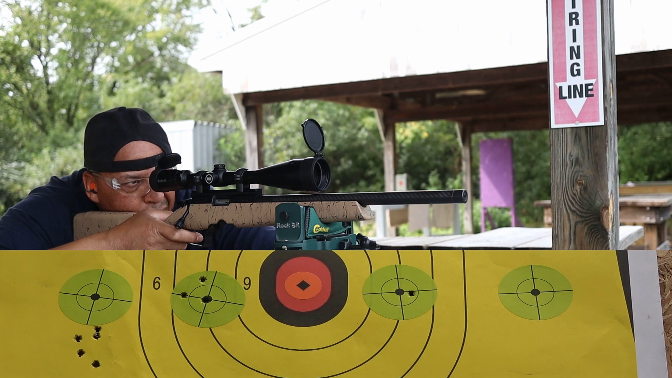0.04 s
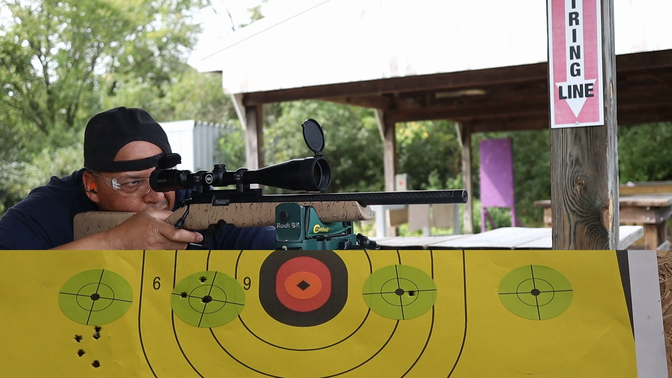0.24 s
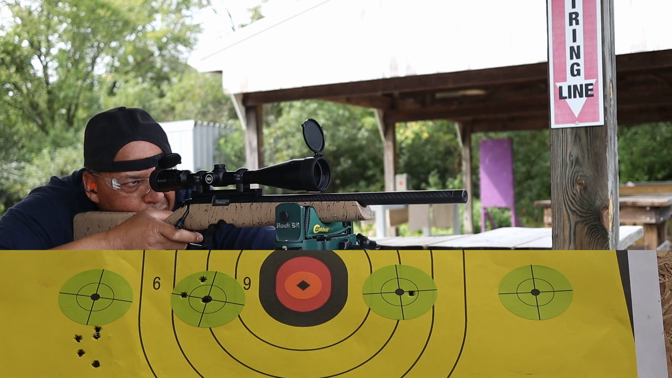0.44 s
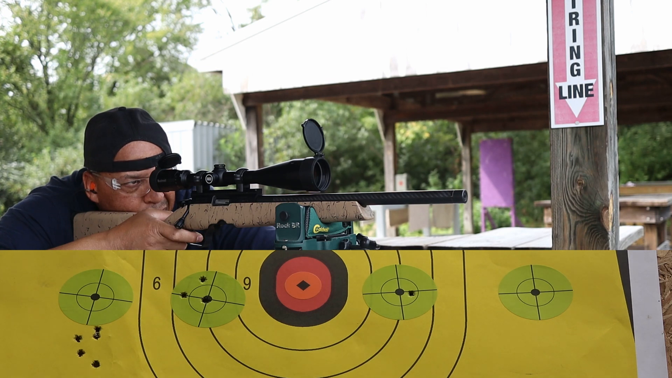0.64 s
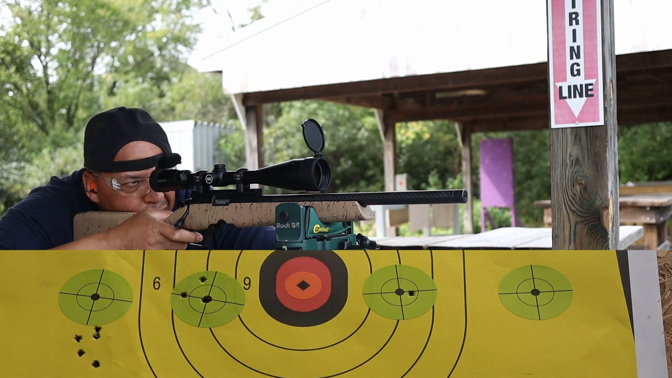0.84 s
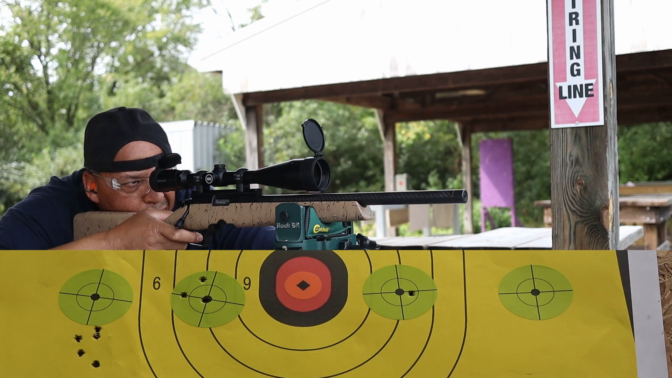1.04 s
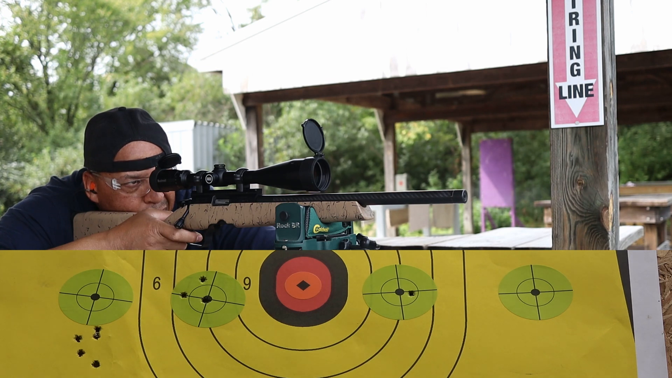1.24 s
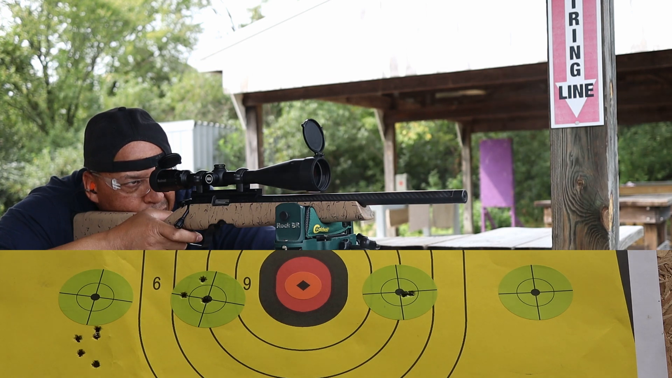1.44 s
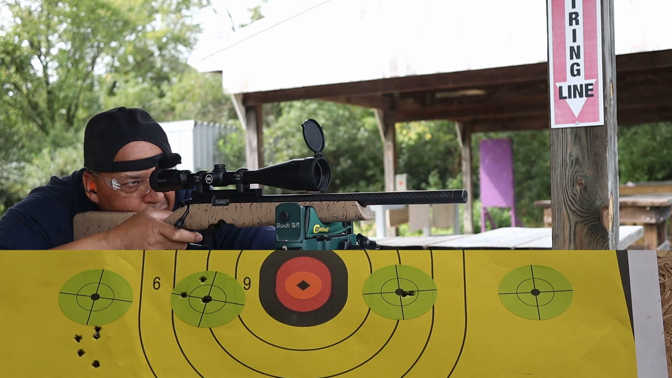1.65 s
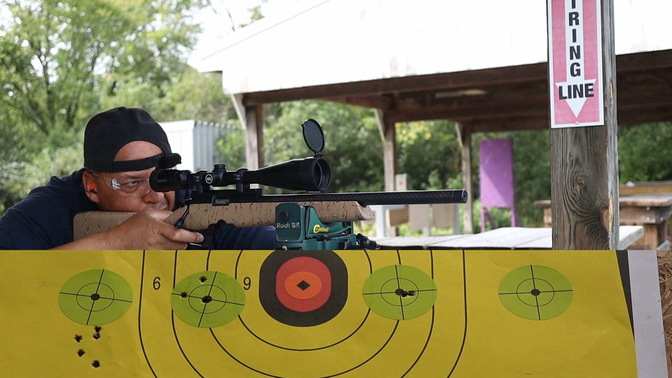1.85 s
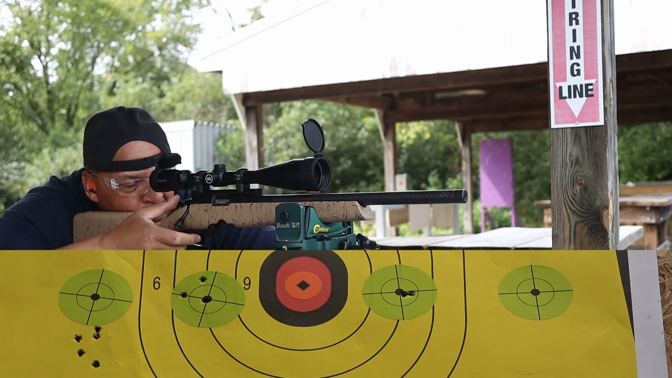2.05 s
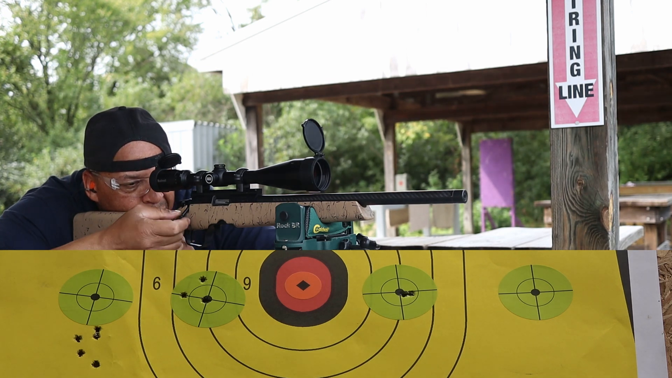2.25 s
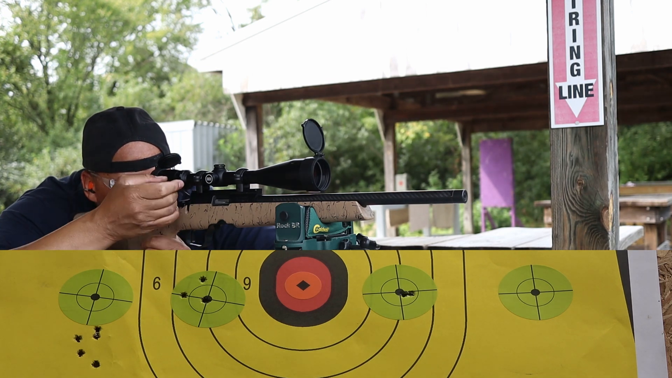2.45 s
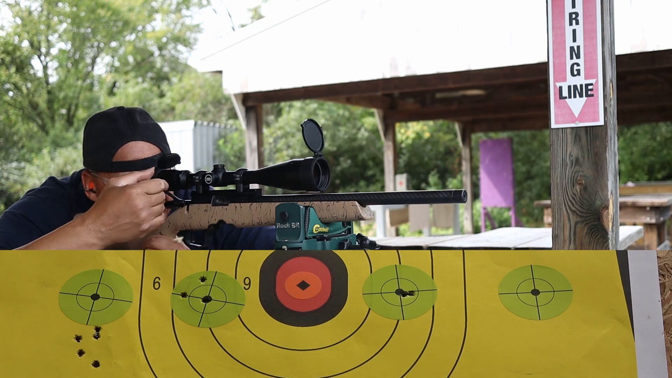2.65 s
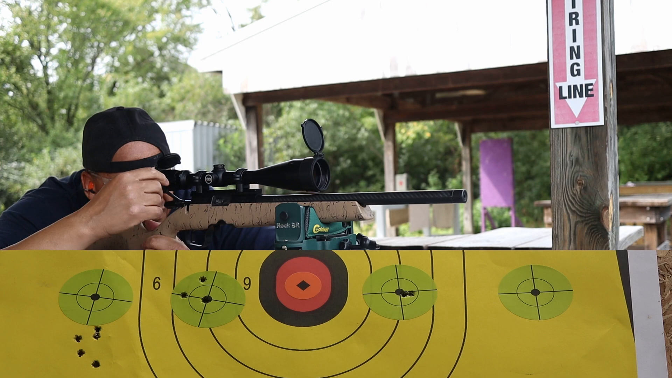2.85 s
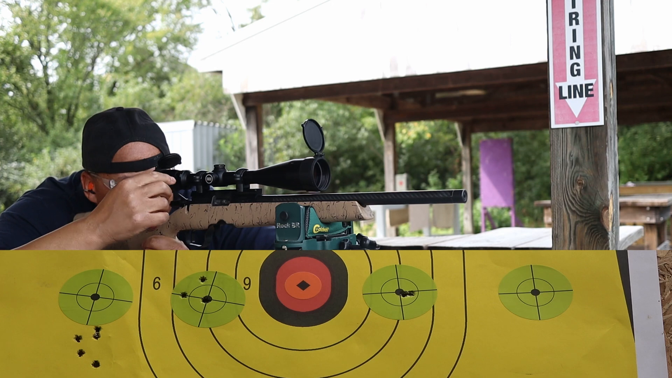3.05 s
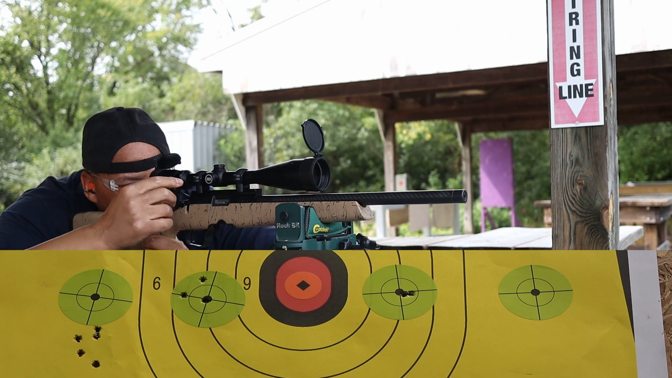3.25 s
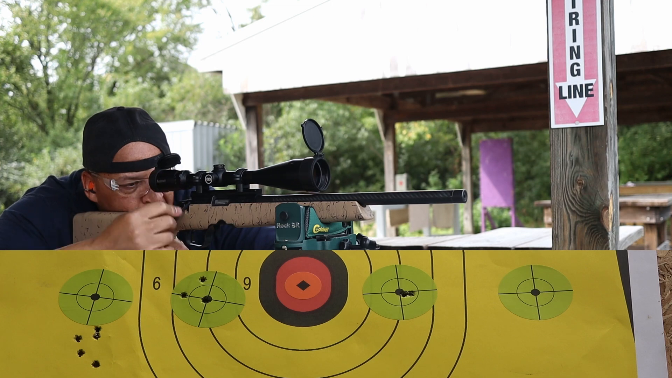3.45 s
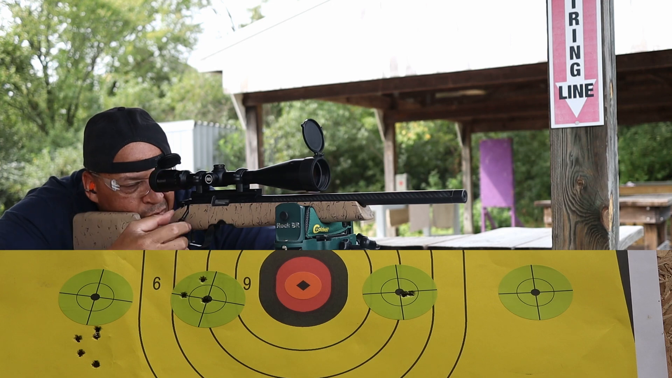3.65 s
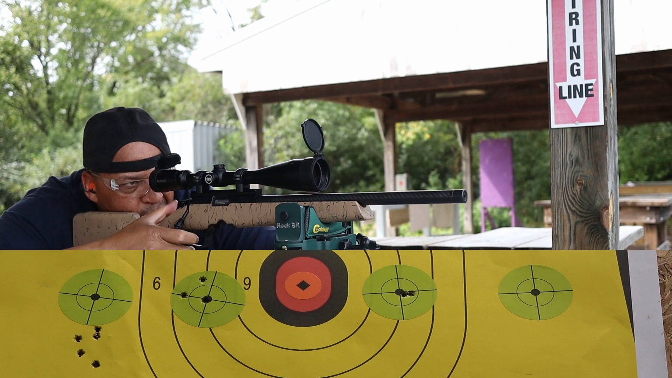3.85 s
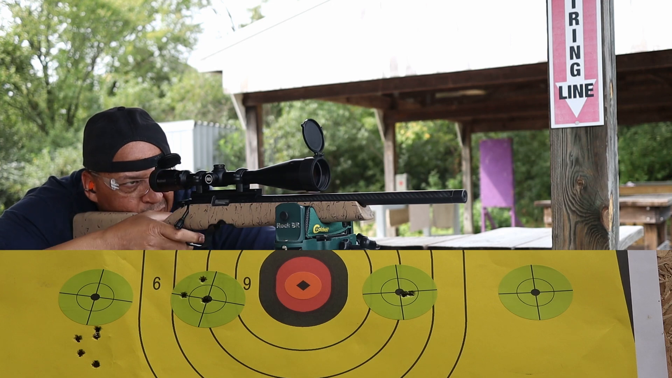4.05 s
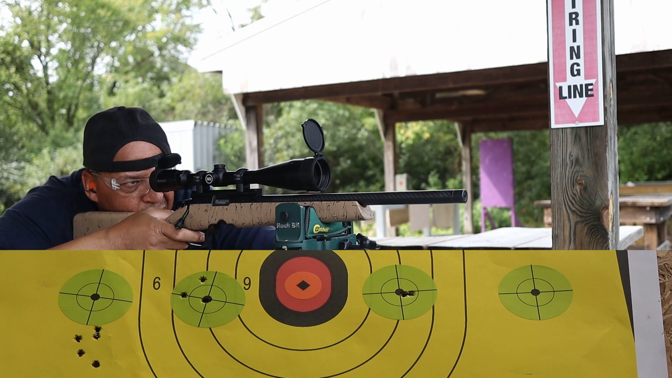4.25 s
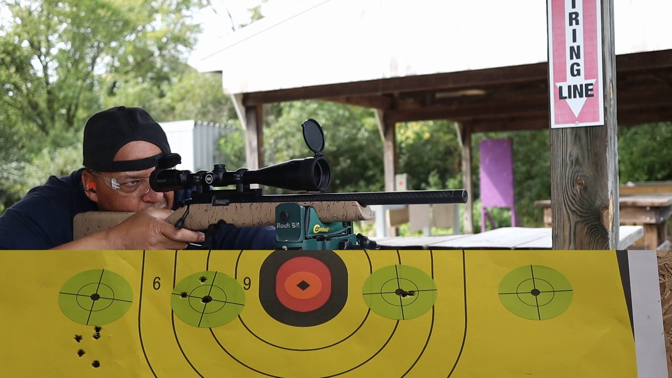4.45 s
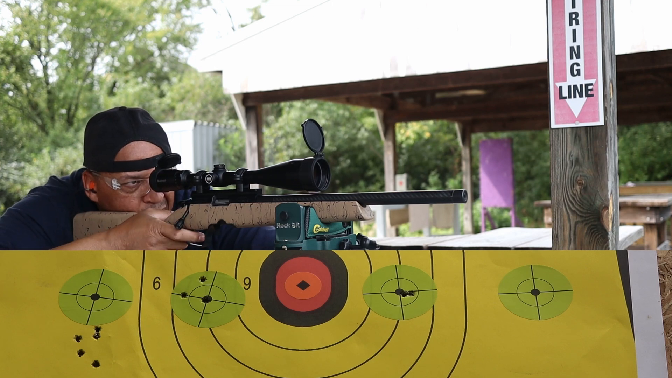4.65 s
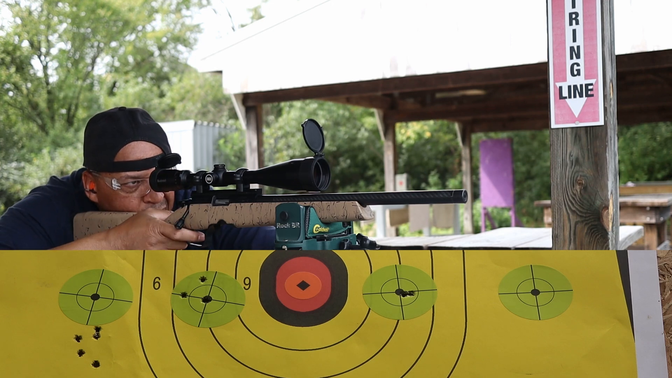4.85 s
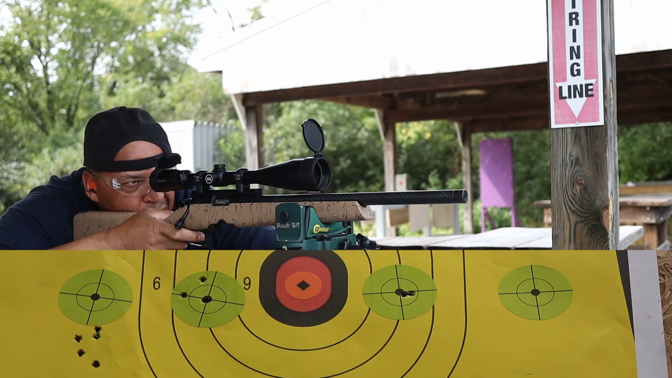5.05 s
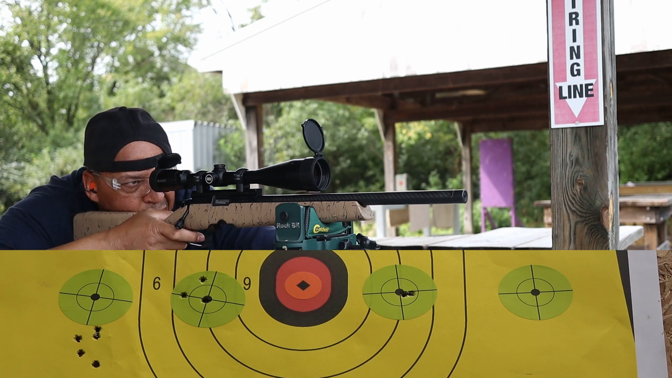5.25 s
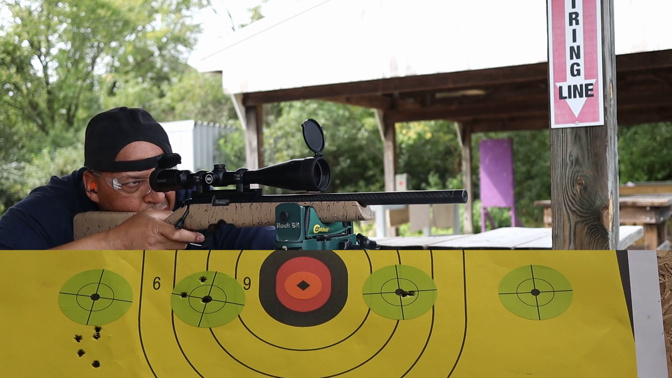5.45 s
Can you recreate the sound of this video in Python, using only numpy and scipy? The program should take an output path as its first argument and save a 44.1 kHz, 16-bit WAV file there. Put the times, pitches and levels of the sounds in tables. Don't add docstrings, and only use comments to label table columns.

```python
import sys
import numpy as np
from scipy import signal
from scipy.fft import rfft, irfft
from scipy.io import wavfile
from scipy.ndimage import uniform_filter1d

SR = 44100
rng = np.random.default_rng(int(sys.argv[2]) if len(sys.argv) > 2 else 0)


def linear_from_db(decibels):
    return 10 ** (np.asarray(decibels, float) / 20)


def materialize(psi):
    bounded = np.clip(np.atleast_2d(psi).T, -1, 1)
    quanta = np.round(bounded * 32767).astype(np.int16)
    wavfile.write(sys.argv[1], SR, quanta)


N = 242991
TIME = np.arange(N) / SR


def rms_one(x):
    return x / np.sqrt(np.mean(x ** 2) + 1e-20)


def level(rows):
    s, db = np.transpose(rows)
    return linear_from_db(np.interp(TIME, s, db, -150, -150))


def at_hz(points, hz, column=1):
    points = np.array(points)
    return np.interp(np.log(hz), np.log(points[:, 0]), points[:, column])


def band(x, low_hz, high_hz):
    edges_hz = [low_hz, min(high_hz, 0.45 * SR)]
    return signal.sosfilt(signal.butter(2, edges_hz, "band", fs=SR, output="sos"), x)


def coloured(spectrum, size=N):
    hz = np.fft.rfftfreq(size, 1 / SR) + 1
    white = rfft(rng.standard_normal(size))
    return rms_one(irfft(white * linear_from_db(at_hz(spectrum, hz)), size))


def drift(rate_hz):
    slow = signal.butter(2, rate_hz, fs=SR, output="sos")
    return rms_one(signal.sosfilt(slow, rng.standard_normal(N + SR))[SR:])


def fall(t, t60):
    return linear_from_db(-60 * t / t60)


def add(track, s, piece):
    i = round(s * SR)
    track[i:i + len(piece)] += piece[:N - i]


def ringing(modes, scatter_db, size):
    hz, db, t60 = np.array(modes).T[:, :, None]
    t = TIME[:size]
    strength = linear_from_db(db + scatter_db * rng.standard_normal(hz.shape))
    return np.sum(strength * np.sin(2 * np.pi * hz * t) * fall(t, t60), axis=0)


# pitch_hz, level_db (per Hz)
AIR = [(25, -9.5), (120, -0.5), (250, -5.5), (600, -11), (1500, -16.5), (3000, -17), (6000, -24.5),
       (7800, -16.5), (9200, -22.5), (12500, -23.5), (15500, -31.5)]


def air(level_db):
    return linear_from_db(level_db) * coloured(AIR)


def pulsed_tone(hz, width_hz, pulses):
    tone = rms_one(band(rng.standard_normal(N), hz - width_hz / 2, hz + width_hz / 2))
    stroke = np.sin(2 * np.pi * pulses * TIME + 9.0 * drift(1))
    return tone * (0.9 + 1.2 * np.maximum(0.28 + stroke, 0))


def phrases(per_s, first_s, share):
    singing = per_s * (TIME - first_s) % 1 < share
    return uniform_filter1d(1. * singing, size=2500)


# pitch_hz, width_hz, level_db, pulses_per_s
CRICKETS = [
    (4850, 260, 0, 27),
    (4480, 220, -3, 29),
    (5200, 200, -6, 24),
    (10300, 700, -14, 27),
]


def crickets():
    chorus_db, low_db, low_fade_db_per_s = -75, -82, 0.9
    chorus = 0
    for k, (hz, width_hz, db, pulses) in enumerate(CRICKETS):
        song = phrases(2.55 * (1 + 0.015 * k), 0.33 + 0.14 * k, share=0.66)
        chorus = chorus + linear_from_db(db + 3.5 * drift(5)) * pulsed_tone(hz, width_hz, pulses) * (0.47 + song)
    chirps = 0.45 + phrases(3.65, -0.03, share=0.45)
    low_gain = linear_from_db(low_db + 2 * drift(1.1) - low_fade_db_per_s * TIME)
    low = low_gain * pulsed_tone(3680, 450, pulses=46) * chirps
    return rms_one(chorus) * linear_from_db(chorus_db) + low


# pitch_hz, level_db (per Hz)
THUMP = [(15, -42), (25, -14.5), (72, 1.5), (91, -4.5), (131, -10), (161, -16), (220, -25), (290, -50.5),
         (480, -120)]
RUBBING = [(120, -25), (200, 0), (292, 9.5), (831, -4), (951, -5), (1110, -7), (1500, -24.5), (1950, -5.5),
           (3300, -120)]
# centre_s, half_width_s, level_db
BENCH = [
    (1.0, 0.19, -60),
    (1.7, .14, -63),
    (2.35, 0.33, -54.5),
    (3.4, 0.31, -58),
    (4.3, 0.44, -56.5),
    (5.15, 0.31, -62),
]
# start_s, loudest_s, end_s, level_db
RUB = [
    (1.8, 2.35, 3.0, -58.5),
    (2.701, 3.2, 3.95, -62.5),
    (3.908, 4.22, 4.45, -66.5),
]


def bench():
    resting_db, rub_fade_db = -80.5, 9.5
    swells = sum(linear_from_db(db) * np.exp(-((TIME - s) / width) ** 2) for s, width, db in BENCH)
    thump = coloured(THUMP) * linear_from_db(5.0 * drift(12)) * (linear_from_db(resting_db) + swells)
    strokes = sum(level([(start, db - rub_fade_db), (loudest, db), (end, db - rub_fade_db)])
                  for start, loudest, end, db in RUB)
    return thump + coloured(RUBBING) * linear_from_db(2 * drift(15)) * strokes


# pitch_hz, level_db, t60_s
CASE_MODES = [(12400, -3, .16), (12470, -8, .12)]
# start_s, level_db (peak)
CASE = [
    (2.8931, -53),
    (2.9865, -56),
    (2.9967, -50),
    (3.6069, -63),
    (3.6268, -61),
    (3.7894, -77),
    (3.8087, -67.5),
]


def case():
    out = np.zeros(N)
    for s, db in CASE:
        add(out, s, linear_from_db(db - 4) * ringing(CASE_MODES, scatter_db=3.5, size=12000))
    return out * linear_from_db(5.0 * drift(90))


# pitch_hz, level_db, t60_s
ACTION = [(1570, -6, .012), (1800, 1, .022), (2000, -4, .016), (2350, -7, .012), (2720, -8, .012),
          (3210, -6, .010), (3600, -6, .010), (4200, -4, .010), (5100, -6, .008)]
# start_s, length_s, start_level_db, end_level_db
SLIDE = [
    (2.12, .08, -58, -62.5),
    (2.432, 0.013, -63, -36),
    (2.668, .052, -47, -41),
    (3.048, 0.082, -47.5, -56),
    (3.227, .023, -47, -32),
    (3.342, .033, -60, -45),
    (3.547, 0.023, -69.5, -44),
    (3.594, 0.05, -59, -64),
]


def sliding():
    clicks = rng.random(N) < 3000 / SR
    grit = clicks * rng.standard_normal(N) * linear_from_db(2.9 * drift(29))
    body = ringing(ACTION + [(700, 2, 0.021), (900, 0.24, 0.023)], scatter_db=2.0, size=2000)
    body[0] = 10.0
    strokes = rms_one(grit) * sum(level([(s, first_db), (s + length, last_db)])
                                  for s, length, first_db, last_db in SLIDE)
    return band(signal.fftconvolve(strokes, body / np.linalg.norm(body))[:N], 400, 6800)


# start_s, level_db (peak thunk in stock), pitch_hz (thunk), steel_level_db (peak), sharpness_db (per band)
REACHING = [
    (1.9644, -76, 472.4, -54, -3.5),
    (2.046, -54, 491, -59, -3),
    (2.1073, -42, 1040, -41, -9),
    (2.1403, -52, 450, -55.5, 1.5),
    (2.152, -53, 446, -51, -3),
    (2.1655, -58, 510, -54, 1),
    (2.19, -45.5, 510, -48.5, 2.5),
    (2.326, -43, 1100, -52.5, -7.5),
]
OPENING = [(2.4376, -43, 719, -51, -5), (2.6719, -55.5, 820, -50, 0), (2.6899, -50, 748, -43, -1),
           (2.4468, -29, 752, -34, -12), (2.5061, -49.5, 750, -43, -24), (2.523, -58, 700, -57, -17),
           (2.552, -48, 670, -43.5, -2), (2.5678, -23.5, 723, -22, -6), (2.6824, -40, 1010, -38, -6),
           (2.697, -53, 900, -32, -20), (2.7124, -26.5, 610, -28.5, -7), (2.7211, -20.5, 920, -13.5, 1.53),
           (2.7234, -20, 450, -12, -4), (2.7282, -22.5, 660, -24.5, -5.5), (2.755, -45, 992, -52, -2.5),
           (2.8939, -30, 466.5, -29, -3.5), (2.987, -59, 432, -50, 0), (2.9965, -51, 812, -47.5, 1.5)]
CLOSING = [(3.0645, -46, 590, -53, 2), (3.235, -35, 793, -38, -16.5), (3.0603, -37.5, 637, -39, -29),
           (3.0942, -36.5, 980, -38.5, -16), (3.1082, -37.5, 710, -45, -22), (3.3233, -54.5, 537, -54, -9),
           (3.3632, -60.5, 790, -46.5, -6), (3.4711, -44.5, 900, -65, 1), (3.573, -32, 900, -33, -7),
           (3.6003, -49, 767, -56.5, 2), (3.6485, -10, 897, -18.5, -6.5), (3.9158, -59, 429.5, -50.5, -14),
           (4.2411, -56, 495, -55, -5), (4.98, -56, 900, -53.5, -7)]
# start_s, touches, level_db (thunk), pitch_hz, steel_level_db
STUTTERS = [
    (3.237, 4, -27, 720, -28.5),
    (3.375, 3, -29.5, 640, -34.5),
]


def contacts():
    gap_s, spread_db, sharpness_db = 0.004, 3.5, -2.5
    touches = []
    for s, count, db, hz, steel_db in STUTTERS:
        for k in range(round(count)):
            uneven_db = steel_db + spread_db * rng.standard_normal()
            touches.append((s + k * gap_s, db, hz, uneven_db, sharpness_db))
    return REACHING + OPENING + CLOSING + touches


BANDS_HZ = [1200, 3000, 7000, 13000]
# (pitch_hz, level_db, t60_s)
AFTER_RING = [
    (2.721, -37.5, [(170, 6, .06), (260, 10, .05), (980, 0, .13), (3025, -9, .2), (3214, -5, .12), (4334, -4, .15), (4410, -7, .13)]),
    (3.649, -36, [(110, -6, .08), (620, 2, .05), (974, -2, .13), (1077, 0, .07), (2300, -10, .04)]),
    (4.298, -58, [(1980, 0, .07), (2380, -3, .06), (3900, -8, .04)]),
]


def bolt():
    middle_lift_db = 4
    out, t = np.zeros(N), TIME[:800]
    for s, db, thunk_hz, steel_db, sharp_db in contacts():
        rattle = rng.standard_normal(800) * t * np.exp(-t / 0.0015)
        rattle[38] = 2.2 * np.abs(rattle).max()
        thunk_modes = [(thunk_hz, 0, 0.012), (thunk_hz * 0.97, -8, 0.045),
                       (thunk_hz * 0.97, -8, 0.012), (thunk_hz * 0.758, -8, 0.015)]
        thunk = np.pad(ringing(thunk_modes, scatter_db=1.0, size=2000), (30, 0))
        steel = 0.21 * ringing(ACTION, scatter_db=5.5, size=1200)
        steel[0] = 3.1
        steel = np.convolve(rattle, steel)
        soft_push = np.hanning(26)
        parts = [band(np.convolve(soft_push, thunk), 540, 2000)]
        for low, high in zip(BANDS_HZ, BANDS_HZ[1:]):
            parts.append(band(band(steel, low, high), low * 0.52, high))
        peaks_db = [db, steel_db, steel_db + sharp_db + middle_lift_db, steel_db + 2 * sharp_db]
        for part, peak_db in zip(parts, peaks_db):
            add(out, s - 0.0015, linear_from_db(peak_db) * part / np.abs(part).max())
    for s, db, modes in AFTER_RING:
        loose = 1 + 8 * band(rng.standard_normal(12000), 20, 120)
        add(out, s, linear_from_db(db) * ringing(modes, scatter_db=0, size=12000) * loose)
    return out


# pitch_hz, near_t60_s, far_t60_s
DYING = [(60, 0.11, .8), (250, 0.23, 0.8), (700, 0.17, .6), (2000, .2, .65), (4900, 0.14, .5),
         (14000, .15, 0.38)]


def dying_noise(spectrum, far_db, stretch):
    noise = [coloured(spectrum, SR), coloured(spectrum, SR)]
    t, out = TIME[:SR], 0
    edges_hz = 40 * 2 ** np.arange(0, 9, 0.5)
    for k, (low, high) in enumerate(zip(edges_hz, edges_hz[1:])):
        near = stretch * at_hz(DYING, low * 1.2)
        far = at_hz(DYING, low * 1.2, column=2)
        out = out + band(noise[k % 2], low, high) * (fall(t, near) + linear_from_db(far_db) * fall(t, far))
    return out


def shelter(x):
    spectrum = [(200, -15.5), (4000, 2.0), (9000, -1.5), (15000, -2.5)]
    return signal.fftconvolve(x, dying_noise(spectrum, far_db=-11.5, stretch=0.88))[:N]


# start_s, level_db (peak), pitch_hz, ring_ms
SLAP = [
    (1.6966, -25, 3000, 2),
    (1.6986, -21, 2700, 2),
    (1.6990, -18, 4400, 2),
    (1.6995, -30, 1400, 3),
    (1.7100, -26, 3300, 3),
    (1.7270, -29, 450, 4),
    (1.7540, -38, 500, 8),
]
# pitch_hz, level_db (per Hz)
SLAP_TAIL = [(88, -27), (150, -7.5), (246, -4.5), (468, -12), (1140, -20), (1380, -15), (4080, -16.5),
             (14000, -44)]


def backstop():
    out, t = np.zeros(N), TIME[:2000]
    for s, db, hz, ms in SLAP:
        rough = 1.2 * band(rng.standard_normal(2000), 0.6 * hz, 1.6 * hz)
        ring = np.sin(2 * np.pi * hz * t) + rough
        add(out, s, linear_from_db(db) * ring * fall(t, 4 * ms / 1000) * np.minimum(t / 0.00027, 1))
    swell = np.minimum(TIME[:SR] / 0.0026, 1)
    add(out, 1.70, linear_from_db(-38.5) * swell * dying_noise(SLAP_TAIL, far_db=-26, stretch=1.8))
    return out


# start_s, pitch_hz, level_db, t60_s
CRACK = [
    (1.4292, 4400, 10, .003),
    (1.4303, 2200, 3, .003),
    (1.4298, 5800, 2, .003),
    (1.4296, 10000, -2, .004),
    (1.4302, 13500, -5, .004),
]
# pitch_hz, level_db (per Hz)
ROAR = [(29, -72), (50, -28), (91, -19.5), (187, -22), (232, -5.5), (333, -6), (607, -9), (735, -5),
        (957, -11), (1080, -11.5), (6230, -20.5), (13700, -31), (15500, -49)]


def shot():
    out, t = np.zeros(N), TIME[:900]
    swings = [(1.4257, -6, 2.2), (1.4277, -2, 1.3)]
    trip_ms, trip_loss_db = 2.3, 0.74
    for k in range(4):
        swings.append((1.4313 + k * trip_ms / 1000, -1.5 - k * trip_loss_db, trip_ms))
    for s, db, ms in swings:
        add(out, s, -linear_from_db(db) * np.sin(np.linspace(0, 2 * np.pi, round(ms * SR / 1000))))
    for s, hz, db, t60 in CRACK:
        burst = rng.standard_normal(55) / 4
        add(out, s, np.convolve(burst, linear_from_db(db) * np.sin(2 * np.pi * hz * t) * fall(t, t60)))
    out = band(out, 120, 15000)
    rise = np.minimum(TIME[:SR] / 0.005, 1)
    add(out, 1.4252, linear_from_db(-6.5) * rise * dying_noise(ROAR, far_db=-17.5, stretch=1.2))
    return out


def scene():
    near = bolt() + sliding() + case()
    background = crickets() + bench() + air(-69.5)
    mid = shot() + backstop() + near + linear_from_db(-49.5) * shelter(near) + background
    smear = rms_one(rng.standard_normal(200) * np.hanning(200)) / 30
    side = linear_from_db(-23) * signal.fftconvolve(np.clip(mid, -1, 1), smear)[:N] + air(-87)
    return np.array([mid + side, mid - side])


def roll_off(x):
    return signal.sosfilt(signal.butter(12, 15760, fs=SR, output="sos"), x)


def record(dry):
    dry = signal.sosfilt(signal.butter(2, 60, "high", fs=SR, output="sos"), dry)
    clipped = dry / (1 + np.abs(dry) ** 8.0) ** (1 / 8.0)
    dulled = signal.sosfilt(signal.butter(4, 15000, fs=SR, output="sos"), clipped)
    return roll_off(dulled)


dry = scene()
out = record(dry)
materialize(out)
```